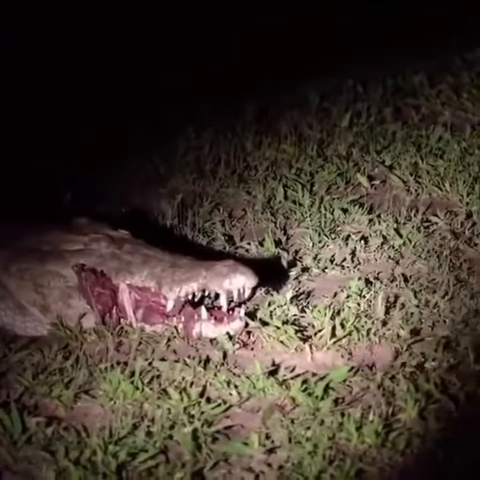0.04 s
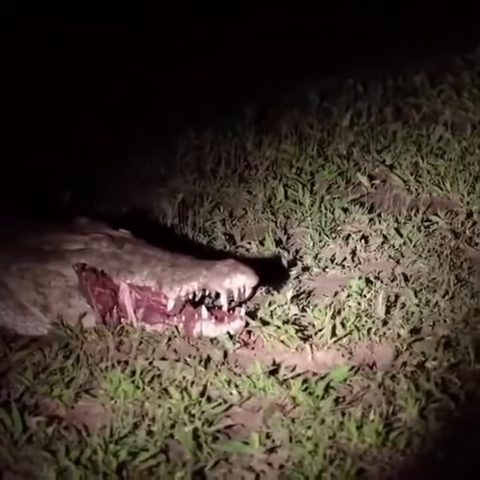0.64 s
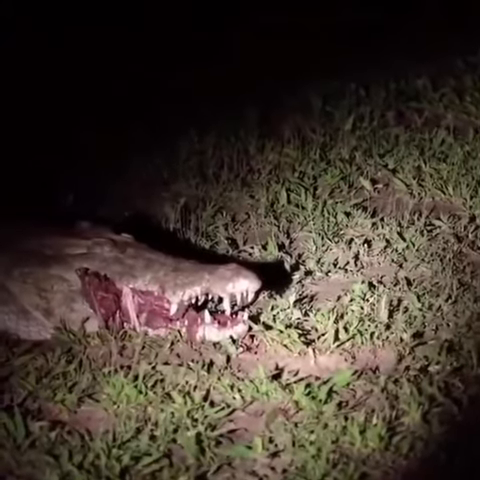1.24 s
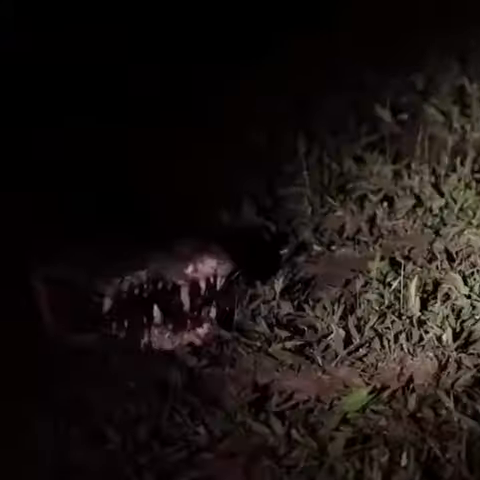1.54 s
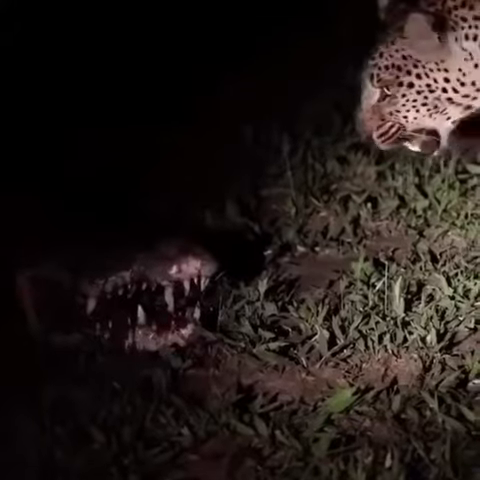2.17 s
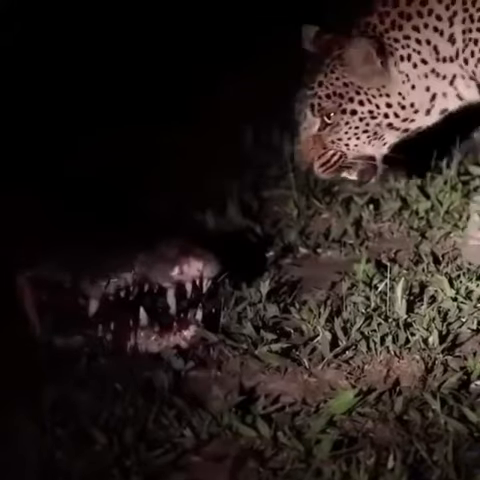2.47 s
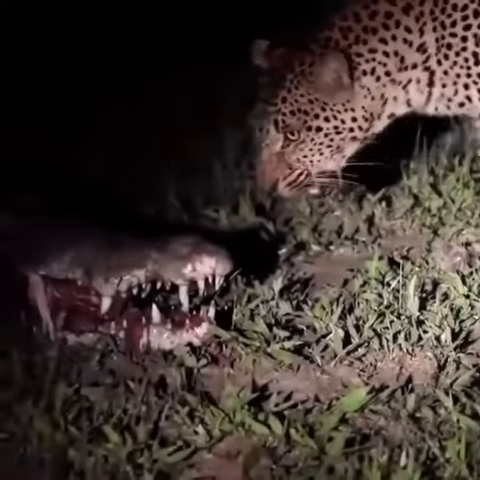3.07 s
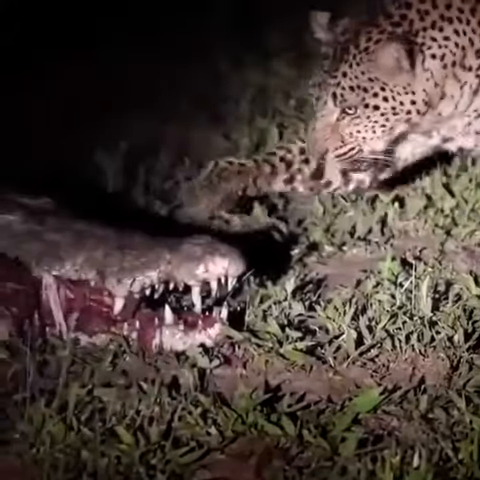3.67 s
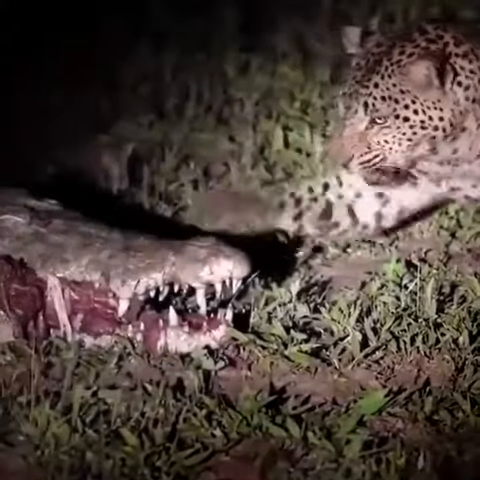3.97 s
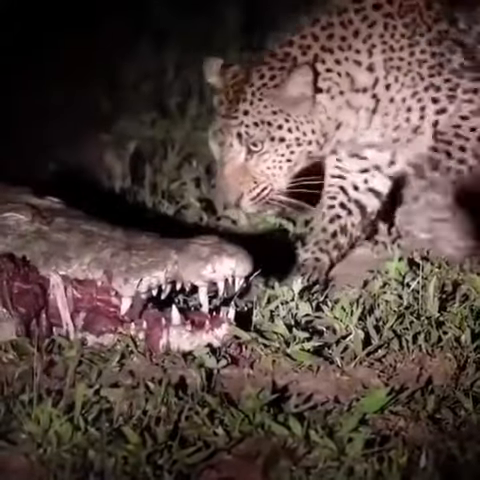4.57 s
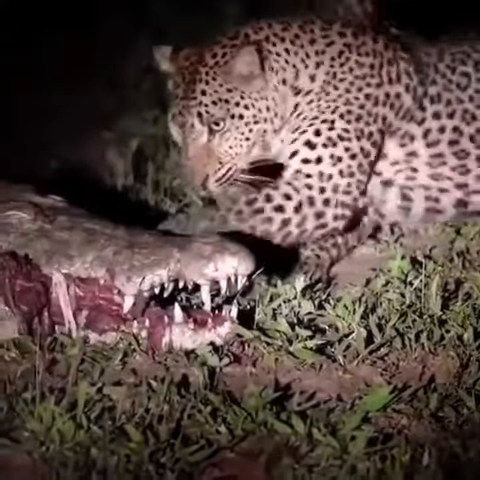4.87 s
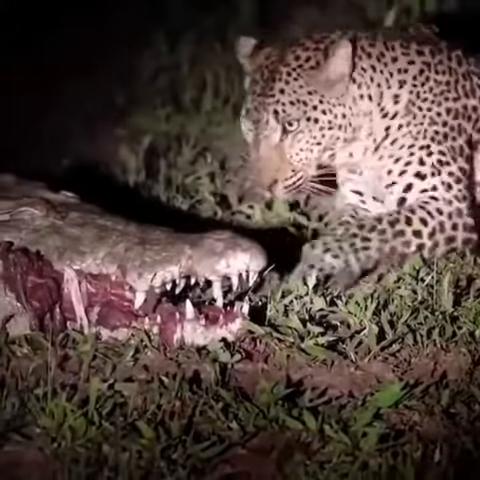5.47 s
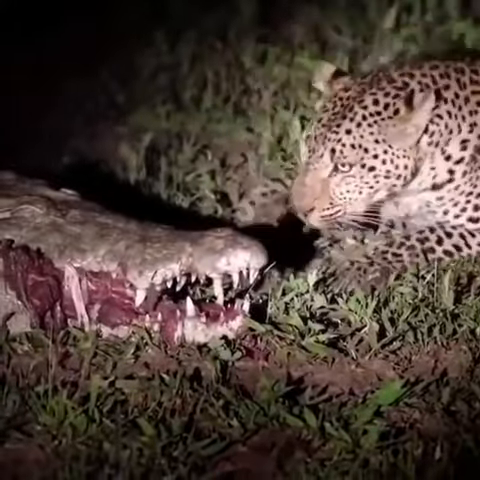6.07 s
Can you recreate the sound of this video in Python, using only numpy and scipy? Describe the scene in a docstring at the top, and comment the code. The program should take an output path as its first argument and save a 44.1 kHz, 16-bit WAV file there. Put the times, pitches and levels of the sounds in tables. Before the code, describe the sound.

A night chorus outdoors runs throughout: a bush cricket gives high, scraping chirps about two and a half times a second over a shimmer of far insects and faint moving air. A very faint distant hoot fades at the start, and a soft rustle follows at about 0.6 seconds. A second cricket trills in runs, and from 1.5 seconds small frogs pip from the left. At 2.2 seconds a leopard, close and centred, begins a low growl of slow rasping pulses with a deep chest rumble, lasting about a second. A louder, short growl catches harshly at 3.3 seconds. Two softer growls follow between 3.8 and 4.9 seconds, then another loud, open-mouthed one from 5 to 5.5 seconds. A faint growl and a short stronger one finish at about 6.3 seconds. Brief, very high insect zips sound near 4.3, 4.8 and 5.9 seconds.

```python
"""A leopard growling at night

A leopard growls over a carcass on a lawn. Its vocal folds slap shut in slow pulses that ring its
chest and throat; each growl swells, sags and slows, the loudest with the mouth open. A bush-cricket
scrapes its wings in nearly even chirps, another cricket trills, reed frogs pip from the left and an
insect zips very high. Behind them are a faint hoot, a rustle and the shimmer of far insects."""
import sys
import numpy as np
from scipy import signal
from scipy.fft import rfft, irfft
from scipy.io import wavfile
from scipy.ndimage import uniform_filter1d

SR = 44100
rng = np.random.default_rng(int(sys.argv[2]) if len(sys.argv) > 2 else 0)


def pcm_store(signal):
    """Save signal as 16-bit PCM."""
    levels = np.round(np.clip(np.atleast_2d(signal), -1, 1) * 32767)
    wavfile.write(sys.argv[1], SR, levels.astype(np.int16).T)


N = 279153
T = np.arange(N) / SR
FREQS = np.arange(N // 2 + 1) * SR / N

# The leopard's growls. In all tables, levels are relative: the functions add their own gain.
# start_s, end_s, attack_s, peak_db, sag_db_per_s, first_pulses_per_s, slowing_hz_per_s,
# first_throat_hz, last_throat_hz, first_mouth, last_mouth (0 shut, 1 open), rasp_tilt_db_per_octave
GROWLS = [(2.173, 3.112, 0.15, -31.5, 11, 21.8, 5.4, 167, 224, 0.32, .01, -8),
          (3.316, 3.644, 0.054, -26.5, 13, 19.4, .5, 203, 203, 0.38, 0.22, -3),
          (3.82, 4.45, 0.16, -35, 35, 24, 6.3, 130.4, 102, 0.4, .2, -2),
          (4.509, 4.933, 0.035, -37.5, 16, 31, 55.3, 183, 216, 0.04, .04, 0),
          (5.035, 5.501, 0.12, -25, 26, 20.4, 5, 198.9, 220, 0.5, 0.49, 9.5),
          (5.69, 6.16, 0.17, -47, 1, 22.3, 5.9, 115, 160, 0.4, .15, 0),
          (6.137, 6.397, 0.089, -33, 50, 19.7, 5.6, 163, 192, 0.3, .1, 3)]
# The pitches at which the open mouth rings: pitch_hz, width_hz, level_db
MOUTH_RINGS = [(444.5, 24, -2.5), (1000, 200, -14.5), (1590, 89, -11.5)]
CHEST_FADE_DB_PER_S = 10.5  # the chest's boom dies sooner than the throat's pulses


def undb(db):
    """Turn decibels into a gain."""
    return 10 ** (np.asarray(db) / 20)


def unit(x):
    """Scale to an average (rms) level of 1."""
    return x / np.sqrt(np.mean(x ** 2))


def curve(rows):
    """Join (time_s, value) rows by straight lines."""
    return np.interp(T, *np.transpose(rows))


def add(out, sound, at):
    """Mix a sound in from a given second on."""
    i = int(np.clip(at * SR, 0, N))
    out[i:i + len(sound)] += sound[:N - i]


def band(x, hz, width_hz):
    """Keep only the pitches around hz."""
    edges_hz = [hz - width_hz / 2, hz + width_hz / 2]
    return signal.sosfilt(signal.butter(3, edges_hz, "band", fs=SR, output="sos"), x)


def resonate(x, hz, width_hz):
    """Make one pitch of a sound stand out."""
    return signal.lfilter(*signal.iirpeak(hz, hz / width_hz, fs=SR), x)


def ring(t, hz, width_hz):
    """A struck tone; the wider it is, the sooner it dies."""
    return np.exp(-np.pi * width_hz * t) * np.sin(2 * np.pi * hz * t)


def sine(hz):
    """A tone that follows a changing pitch."""
    return np.sin(2 * np.pi * np.cumsum(hz) / SR)


def walk(rate):
    """Wander around zero by about 1, to a new random value `rate` times a second."""
    knots = rng.standard_normal(int(N / SR * rate) + 2)
    return np.interp(T * rate, np.arange(len(knots)), knots)


def gates(rows, edge_s):
    """Fade in and out for each (start_s, end_s, level_db) row."""
    return sum(undb(db) * np.clip(np.minimum(T - start, end - T) / edge_s + .5, 0, 1)
               for start, end, db in rows)


def outdoors(x, lead_ms, scatter_db, tail_s, left_db=0):
    """Sound reaches the left lead_ms sooner; bushes scatter a different echo to each side."""
    t = T[:SR // 2]
    right = irfft(rfft(x) * np.exp(-2j * np.pi * FREQS * lead_ms / 1000), N)
    direct = np.array([x, right]) * undb([[left_db / 2], [-left_db / 2]])
    tails = rng.standard_normal((2, len(t))) * undb(-60 * t / tail_s)
    tails /= np.sqrt(np.sum(tails ** 2, axis=1, keepdims=True))
    scattered = signal.fftconvolve(x[None], tails, axes=1)[:, :N]
    return direct + undb(scatter_db) * scattered


def wash(spectrum, shared=0.54, blend_hz=390):
    """Noise from all around: the bass is alike on both sides, part of the treble comes from the left."""
    hz, db = np.transpose(spectrum)
    gain = undb(np.interp(np.log(FREQS + 1), np.log(hz), db)) * np.sqrt(SR / 2)
    common, left, right = rfft(rng.standard_normal((3, N)))
    alike = np.clip(shared + (1 - shared) * np.exp(-(FREQS / blend_hz) ** 2), 0, 1)
    late = np.exp(-2j * np.pi * FREQS * 7 / SR)  # a delay of 7 samples
    sides = np.sqrt(alike) * np.array([common, common * late])
    sides += np.sqrt(1 - alike) * np.array([left, right])
    return irfft(gain * sides, N)


def night(groups_hz=(2500, 4000, 5500, 7300, 11000)):
    """Countless far insects shimmer, each group swelling by itself, over softly moving air."""
    # A high hiss of far insects, with a gap near 9 kHz that is not their own: pitch_hz, level_db_per_hz
    high_hiss = [(300, -135), (1500, -104), (2100, -84.5), (2600, -71), (3100, -95), (3700, -79),
                 (4250, -80), (5000, -83), (5800, -77), (7300, -74.5), (8200, -84), (9000, -108),
                 (10300, -88.5), (13000, -93.5)]
    # The tone colour of the air: pitch_hz, level_db_per_hz
    air_colour = [(25, -122), (70, -113), (200, -100), (400, -91), (700, -89.5), (1000, -85.5),
                  (1500, -87.5), (2000, -81.5), (3200, -104)]
    # The slow swell of the air: time_s, level_db
    air_swell = [(0, -4.5), (.45, -1), (.62, 0), (.88, -2.5), (1.5, -4.5), (2.4, -1.5), (4.1, 0),
                 (6.33, -2)]
    chorus, out = rfft(wash(high_hiss)), 0
    for share in np.eye(len(groups_hz)):
        voices = irfft(chorus * np.interp(FREQS, groups_hz, share), N)
        shimmer_db = 4.5 * np.tanh(.4 * walk(9) + .7 * walk(35) + .3 * walk(140)) - .6
        out = out + voices * undb(shimmer_db)
    return out + wash(air_colour) * undb(curve(air_swell) + 1.4 * walk(40) + 1.4 * walk(16))


def far_crickets(waver_hz=150, uneven_db=10):
    """Thin, wavering trills from all sides give the chorus its grain."""
    # Crickets that never pause: pitch_hz, pulses_per_s, level_db
    crickets = [(4380, 53, -54.5), (5050, 27, -58.5), (5430, 68, -54), (5825, 34, -53), (6940, 64, -46.5),
                (7290, 40, -54), (7650, 79, -56)]
    out = 0
    for hz, rate, db in crickets:
        pulses = sine(rate / 2 * (1 + .12 * walk(15))) ** 4  # two pulses per wave
        pulses *= undb(uneven_db * np.tanh(walk(25)))
        tone = sine(hz + waver_hz * (walk(300) + .6 * walk(20)))
        trill = undb(db) * unit(pulses * tone)
        out = out + outdoors(trill, lead_ms=rng.uniform(-0.21, 0.27), scatter_db=-2, tail_s=0.19)
    return out


def swarm(low_hz, high_hz, level_db, count):
    """Single wing strokes of many crickets, each a brief tone from its own direction."""
    out = np.zeros((2, N))
    for when, pitch, length, size, side, lag in rng.random((count, 6)):
        t = np.arange(0, .005 + .018 * length, 1 / SR)
        shape = undb(10 * size) * np.sin(np.pi * t / t[-1]) ** 2
        phase = 2 * np.pi * (low_hz + (high_hz - low_hz) * pitch) * t
        add(out[0], np.sqrt(side) * shape * np.sin(phase), when * N / SR)
        add(out[1], np.sqrt(1 - side) * shape * np.sin(phase + 2 * np.pi * lag), when * N / SR)
    return undb(level_db) * unit(out * undb(2 * walk(18)))


def far_hoot():
    """A faint, hoarse note fading far away."""
    note = unit(band(rng.standard_normal(N), hz=859, width_hz=128))
    note *= gates([(-.1, 0.3, -58.5)], edge_s=0.15)
    return outdoors(note, lead_ms=0.19, scatter_db=-2.3, tail_s=0.66)


def pip(hz, half_s, rise_hz_per_s=11000):
    """One frog call: a short, slightly hoarse whistle that slides upward."""
    t = np.arange(-half_s, half_s, 1 / SR)
    shape = np.cos(np.pi * t / half_s / 2) ** 2
    hoarse = np.interp(t, np.linspace(-half_s, half_s, 16), rng.standard_normal(16))
    return shape * np.sin(2 * np.pi * (hz * t + rise_hz_per_s * t ** 2 / 2) + 0.021 * hoarse)


def frog_group(count=5, low_hz=2380, high_hz=2580, period_s=.24):
    """A few frogs in the middle distance, each on its own pitch and loosely keeping its own time."""
    out = np.zeros(N)
    for hz in np.linspace(low_hz, high_hz, count):
        chance = rng.standard_normal((N // (SR // 4), 3))
        times = period_s * (np.cumsum(1 + .15 * chance[:, 0]) - 1 - rng.random())
        for at, (_, size, detune) in zip(times[times > 0], chance[times > 0]):
            add(out, undb(2 * size) * pip(hz + 45 * detune, half_s=0.013), at)
    return out


def frogs(near_db=-8, group_db=-9, far_db=-2, far_pips=420, half_s=0.021):
    """Near frogs call from the left, a group behind them; many far ones fill in at random."""
    # Calls of the two nearest frogs, a high and a low one: time_s, level_db, pitch_hz
    near_pips = [(1.587, -25, 2690), (2.106, -23, 2677), (2.636, -25, 2703), (3.02, -31, 2487),
                 (3.156, -22, 2665), (3.948, -27, 2494), (4.068, -22, 2652), (4.164, -27, 2440),
                 (4.334, -23.5, 2510), (4.496, -21, 2680), (4.76, -23, 2544), (5.011, -21.5, 2690),
                 (5.14, -25, 2590), (5.5, -23.5, 2706), (5.578, -27.5, 2470), (5.962, -23.5, 2530),
                 (6.172, -23, 2715)]
    # How loud the other frogs are: time_s, level_db
    chorus_swell = [(0, -40), (1.3, -42), (1.9, -35), (3.15, -34), (3.6, -42), (4.2, -32), (5.2, -37.5),
                    (6.33, -39)]
    near, far, swell = np.zeros(N), np.zeros(N), undb(curve(chorus_swell))
    for at, db, hz in near_pips:
        add(near, undb(db + near_db) * pip(hz, half_s), at - half_s)
    for when, pitch, length, size in rng.random((far_pips, 4)):
        call = pip(hz=2230 + 470 * np.sqrt(pitch), half_s=.004 + .008 * length)
        add(far, undb(far_db + 13 * (size - 1)) * call, when * N / SR)
    group = undb(group_db) * frog_group()
    return (outdoors(near, lead_ms=0.14, scatter_db=0.5, tail_s=0.084, left_db=9.5)
            + outdoors(swell * group, lead_ms=0.086, scatter_db=0, tail_s=0.088, left_db=5.9)
            + outdoors(swell * far, lead_ms=0.12, scatter_db=-1.8, tail_s=0.1, left_db=3.3))


def bush_cricket(strokes_per_s=51, pitch_hz=6330, peaks_db=-5.5, stroke_db=-10, hiss_db=-13):
    """One wing scrapes a row of teeth on the other; the sharp closing stroke stands out."""
    # Narrow pitches that stand out in the chirp as heard through the bushes: pitch_hz, width_hz, level_db
    chirp_peaks = [(6080, 37, 7), (6292, 61, 1.5), (6425, 52, 9), (6530, 110, -5)]
    # The chirps: start_s, end_s, level_db
    chirps = [(.16, .43, -34), (.58, .83, -35.5), (.98, 1.22, -32), (1.37, 1.62, -33.5), (1.76, 2.05, -33),
              (2.19, 2.44, -35.5), (2.61, 2.85, -34), (2.98, 3.26, -34.5), (3.41, 3.68, -35),
              (3.83, 4.1, -33.5), (4.25, 4.5, -35), (4.63, 4.8, -37.5), (5.07, 5.29, -34),
              (5.44, 5.67, -32), (5.83, 6.09, -34), (6.24, 6.4, -37)]
    phase = np.cumsum(strokes_per_s * (1 + .04 * walk(9))) / SR % 1
    stroke = np.exp(-.5 * ((phase - .5) / .07) ** 2) * (1 + .7 * np.tanh(walk(50)))

    def song():
        """The same strokes with a fresh grain each time."""
        tone = sine(pitch_hz + 200 * walk(400))
        scrape = rng.standard_normal(N) * (1 + 0.21 * stroke)
        peaks = sum(undb(db) * resonate(scrape, hz, width) for hz, width, db in chirp_peaks)
        peaks = unit(resonate(peaks, pitch_hz, 1200))
        hiss = unit(band(scrape, 6530, 970))
        return undb(peaks_db) * peaks + undb(stroke_db) * unit(stroke * tone) + undb(hiss_db) * hiss

    direct = outdoors(song(), lead_ms=.19, scatter_db=-20, tail_s=.035)
    through_leaves = undb(-2) * np.array([song(), song()])
    return (direct + through_leaves) * gates(chirps, edge_s=.04) * undb(walk(16))


def rustle(level_db=-59.5, grain_db=1.5):
    """A soft, grainy rustle in the dark before the first growl."""
    leaves = unit(band(rng.standard_normal(N), hz=1350, width_hz=1500) * undb(grain_db * walk(120)))
    leaves *= gates([(.51, .78, level_db)], edge_s=0.14)
    return outdoors(leaves, lead_ms=0.086, scatter_db=0, tail_s=.1)


def trilling_cricket(pulses_per_s=36, pitch_hz=4550, waver_hz=160, gain_db=5.5):
    """A second cricket rubs its wings in runs of wavering pulses."""
    # The trills: start_s, end_s, level_db
    trills = [(.7, 1.45, -61), (1.68, 2.75, -53.5), (3.0, 3.6, -53), (3.85, 4.3, -58), (4.52, 5.3, -52.5),
              (5.6, 6.33, -65)]
    pulses = sine(pulses_per_s / 2 * (1 + .05 * walk(12))) ** 2  # two pulses per wave
    pulses *= undb(2.2 * walk(30) + 3.5 * np.tanh(walk(13)))
    tone = sine(pitch_hz + waver_hz * walk(400))
    song = undb(gain_db) * unit(pulses * tone) * gates(trills, edge_s=0.026)
    return outdoors(song, lead_ms=0.15, scatter_db=-0.11, tail_s=0.23)


def effort_db(growl, t, swell_db=15.5, fade_db=20, release_s=0.034):
    """How hard the leopard pushes: a growl swells, sags steadily and is let go."""
    start, end, attack, peak_db, sag = growl[:5]
    rising = np.clip(1 - (t - start) / attack, 0, 1)
    falling = np.clip(1 - (end - t) / release_s, 0, 1)
    return peak_db - swell_db * rising - sag * np.maximum(t - start - attack, 0) - fade_db * falling


def chest_rumble(gain_db=-22, follow=0.73, smooth_s=0.16, chest_hz=64):
    """A deep flutter of the chest swells before each growl and lingers after it."""
    effort = np.zeros(N)
    for growl in GROWLS:
        start, end = growl[:2]
        chest_db = effort_db(growl, T) - CHEST_FADE_DB_PER_S * (T - start)
        effort += undb(chest_db) * (T > start) * (T < end)
    width = int(smooth_s * SR)
    swell = uniform_filter1d(uniform_filter1d(effort ** follow, width), width)
    noise = rng.standard_normal(N)
    tissue = band(noise, chest_hz, 24) + .22 * band(noise, 130, 110)
    return undb(gain_db) * swell * unit(tissue)


def rasp(mouth, tilt_db, gain_db=-15, rattle_db=-10, rattle_s=0.03, grain_db=5):
    """A spit of air through the mouth, then a ragged rattle; its colour shifts from pulse to pulse."""
    # The tone colour of the throat's rasp: pitch_hz, width_hz, level_db
    rasp_bands = [(620, 200, -1), (980, 340, 4.5), (1600, 300, 1.5), (2050, 400, -6), (3000, 600, -17)]
    t = T[:SR // 8]
    grain = undb(grain_db * np.interp(t, np.linspace(0, t[-1], 60), rng.standard_normal(60)))
    noise, air = rng.standard_normal(len(t)), 0
    for hz, width, db in rasp_bands:
        shifted_hz = hz * (1 + .05 * rng.standard_normal())
        air = air + undb(db + tilt_db * np.log2(hz)) * band(noise, shifted_hz, width)
    spit = np.exp(-t / .004)
    rattle = undb(rattle_db) * grain * np.exp(-t / rattle_s)
    onset = 1 - np.exp(-t / .0006)
    return (mouth + 0.085) * undb(gain_db) * unit(air) * (spit + rattle) * onset


def throat_pulse(throat_hz, mouth, boom=1, chest_hz=66, chest_db=-8, mouth_db=-14):
    """One slap of the vocal folds rings chest and throat; an open mouth adds its own ring."""
    t = T[:SR // 8]
    detune = 1 + 0.045 * rng.standard_normal(3)
    rise, rise_s = 0.29, 0.0035  # the throat rings low at first and rises as the folds close
    bent_time = t - rise * rise_s * (1 - np.exp(-t / rise_s))
    throat = ring(bent_time, throat_hz * detune[1], width_hz=52 * undb(2 * rng.standard_normal()))
    chest = boom * undb(chest_db) * ring(t, chest_hz * detune[0], width_hz=30)
    low_ring = undb(-12) * ring(t, 115 * detune[2], width_hz=62)
    body = (chest + throat + low_ring) * (1 - np.exp(-t / 0.002))
    lips = sum(undb(db) * ring(t, hz * detune[2], width) for hz, width, db in MOUTH_RINGS)
    lips *= 1 - np.exp(-t / 0.00037)
    # closed lips muffle all that lies above the throat's pitch
    cutoff_hz = 1.38 * throat_hz * (1 + 0.5 * mouth)
    muffled = signal.sosfilt(signal.butter(4, cutoff_hz, fs=SR, output="sos"), body)
    return 0.89 * muffled + mouth * undb(mouth_db) * lips


def voice_catch(rasp_db, thump_db=7, roughness=0.33):
    """The voice catches with a dull thump and a spit of air; the mouth rings on roughly."""
    t = T[:SR // 8]
    mouth_ring = sum(undb(db) * ring(t, hz, width) for hz, width, db in MOUTH_RINGS)
    mouth_ring *= 1 + roughness * walk(280)[:len(t)]
    thump = undb(thump_db) * ring(t, hz=105, width_hz=95)
    return mouth_ring - thump + undb(rasp_db) * rasp(mouth=0.75, tilt_db=-1)


def leopard(growl_db=6.5, flap_db=-11, catch_db=-10, uneven_db=1.3, rasp_lead_s=0.0054):
    """Slow rasping pulses, each followed by a weaker loose flap; the loudest growls catch."""
    # Hard catches of the voice: time_s, level_db, rasp_db
    catches = [(3.357, -28, -6), (3.405, -20.5, 4), (3.447, -23, 1), (5.113, -27, -14), (5.159, -20, -12)]
    out = chest_rumble()
    for growl in GROWLS:
        start, end, _, _, _, rate, slowing, first_hz, last_hz, first_mouth, last_mouth, tilt_db = growl
        t = np.arange(0, end - start, 1 / SR)
        cycles = rate * t - slowing * t ** 2 / 2
        pulse_times = start + np.interp(np.arange(int(cycles[-1]) + 1), cycles, t)
        for at in pulse_times:
            size = undb(growl_db + effort_db(growl, at) + uneven_db * rng.standard_normal())
            hz = np.interp(at, [start, end], [first_hz, last_hz])
            mouth = np.interp(at, [start, end], [first_mouth, last_mouth])
            boom = undb(-CHEST_FADE_DB_PER_S * (at - start))
            add(out, size * throat_pulse(hz, mouth, boom), at)
            # air rushes through just before the folds slap shut
            add(out, size * rasp(mouth, tilt_db), at - rasp_lead_s)
            flap = throat_pulse(hz, mouth=0) + rasp(mouth, tilt_db)
            flap *= size * boom * undb(flap_db + 2 * rng.standard_normal())
            add(out, flap, at + rng.uniform(0.01274, 0.036))
    for at, db, rasp_db in catches:
        add(out, undb(db + catch_db) * voice_catch(rasp_db), at)
    return out


def insect_zips(zip_s=0.026, width_hz=850, echo_db=-11):
    """Brief, very high scrapes of a tiny wing, with a different grain on each side."""
    # The zips: time_s, level_db, pitch_hz
    zips = [(4.254, -39.5, 12350), (4.28, -37.5, 11760), (4.802, -32, 12270), (5.927, -29.5, 12050),
            (5.995, -43, 12110)]
    out = np.zeros((2, N))
    t = np.arange(-2 * zip_s, 2 * zip_s, 1 / SR)
    for at, db, hz in zips:
        for side in out:
            scrape = unit(band(rng.standard_normal(len(t)), hz, width_hz))
            add(side, undb(db) * scrape * np.exp(-2 * (t / zip_s) ** 2), at - 2 * zip_s)
    return out + undb(echo_db) * outdoors(out.mean(axis=0), lead_ms=0, scatter_db=7.9, tail_s=.53)


def scene():
    """The leopard in the middle, with the night's small voices all around."""
    return (leopard() + bush_cricket() + trilling_cricket() + far_crickets()
            + swarm(low_hz=4100, high_hz=5600, level_db=-50, count=2200)
            + swarm(low_hz=5600, high_hz=7900, level_db=-45, count=3000)
            + frogs() + insect_zips() + far_hoot() + rustle() + night())


def record(dry):
    """The microphone thins the deepest bass and cuts the highest treble."""
    bottom_hz, top_hz = 37, 13200
    thinned = signal.sosfilt(signal.butter(3, bottom_hz, "high", fs=SR, output="sos"), dry)
    return signal.sosfilt(signal.ellip(10, .2, 80, top_hz, fs=SR, output="sos"), thinned)


dry = scene()
out = record(dry)
pcm_store(out)
```